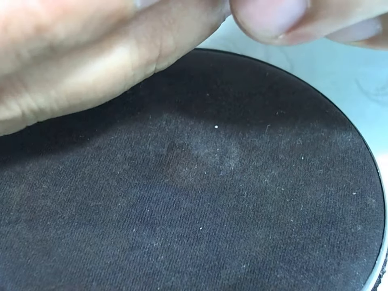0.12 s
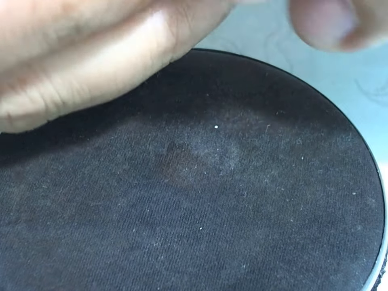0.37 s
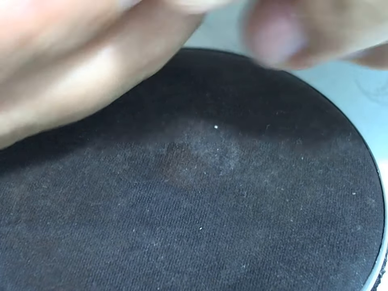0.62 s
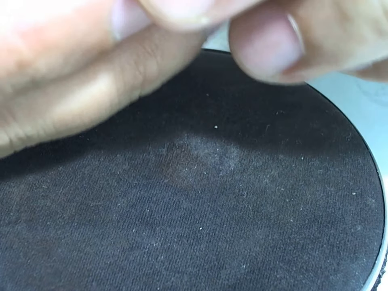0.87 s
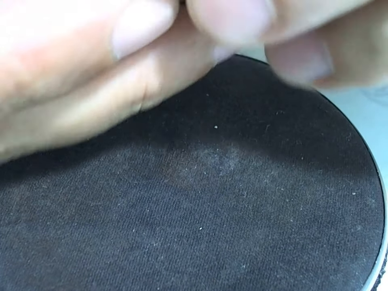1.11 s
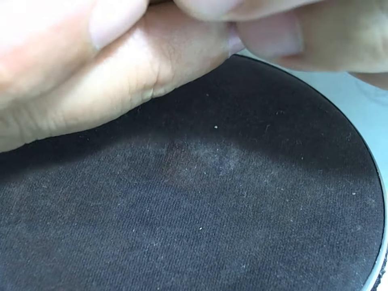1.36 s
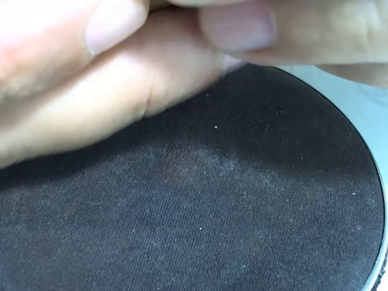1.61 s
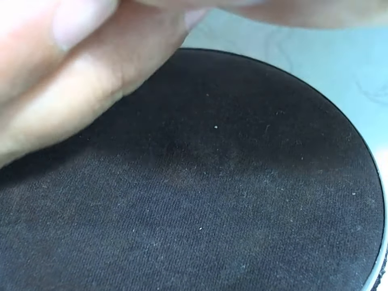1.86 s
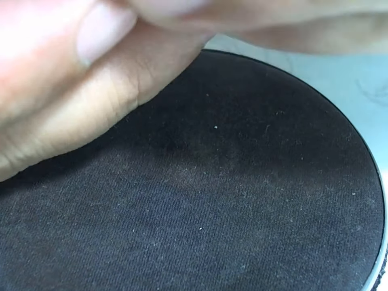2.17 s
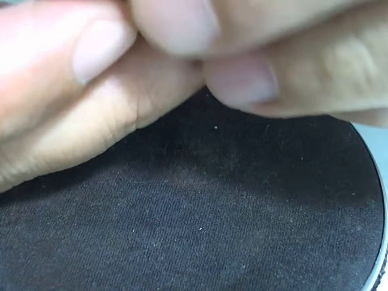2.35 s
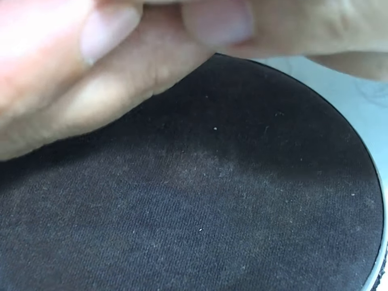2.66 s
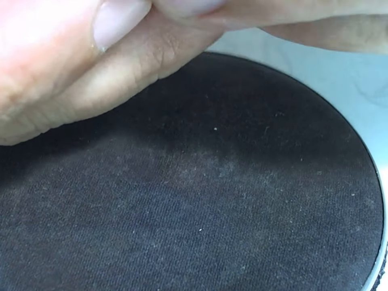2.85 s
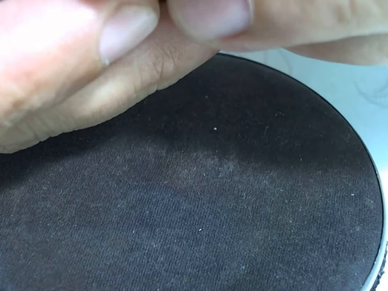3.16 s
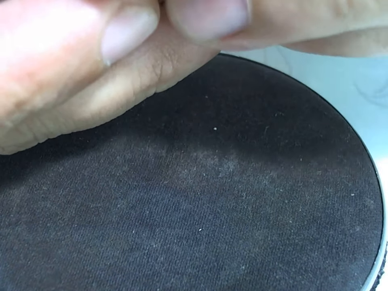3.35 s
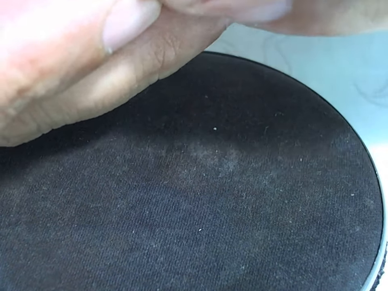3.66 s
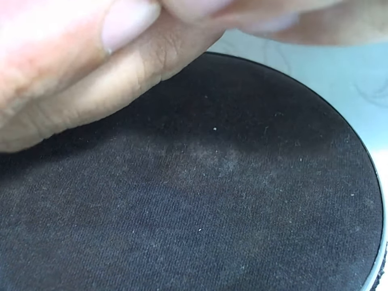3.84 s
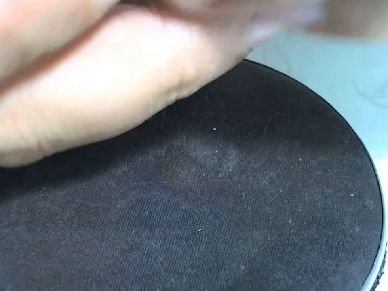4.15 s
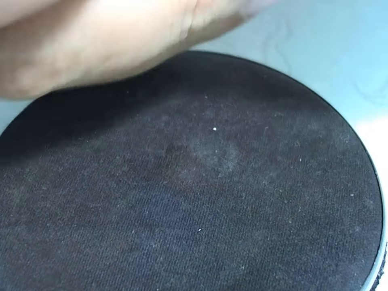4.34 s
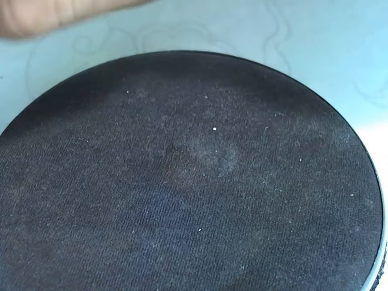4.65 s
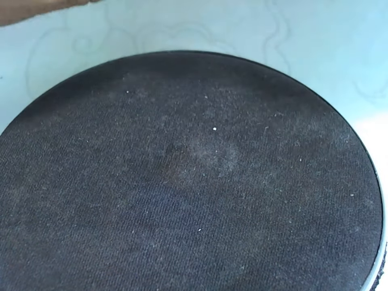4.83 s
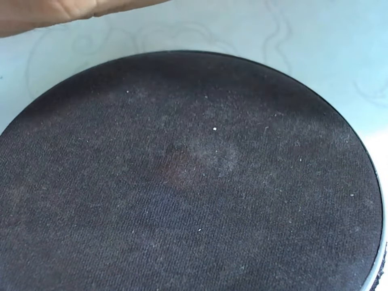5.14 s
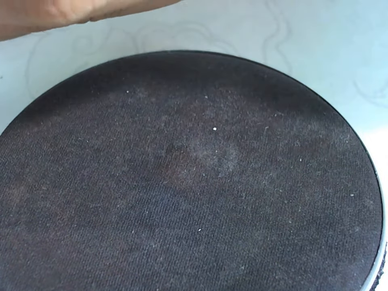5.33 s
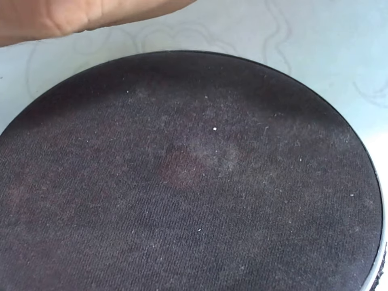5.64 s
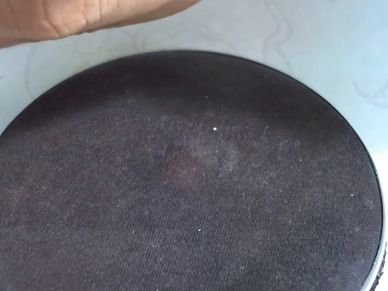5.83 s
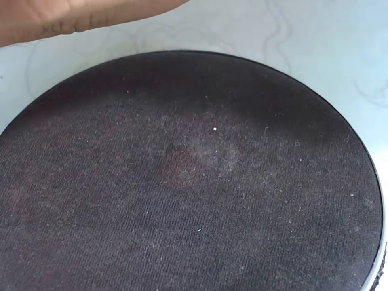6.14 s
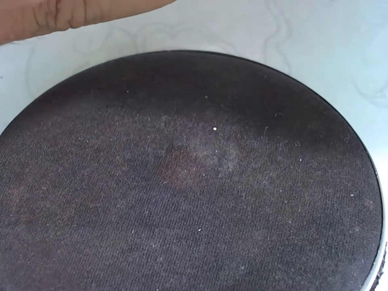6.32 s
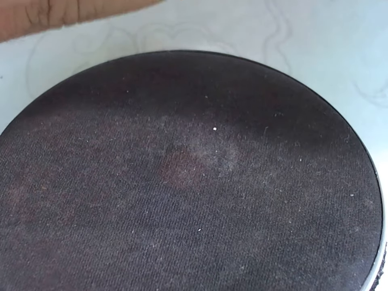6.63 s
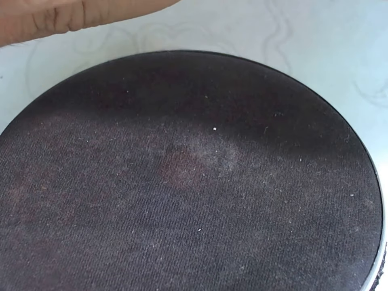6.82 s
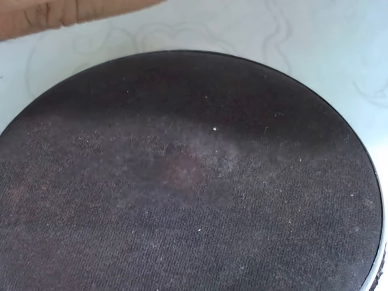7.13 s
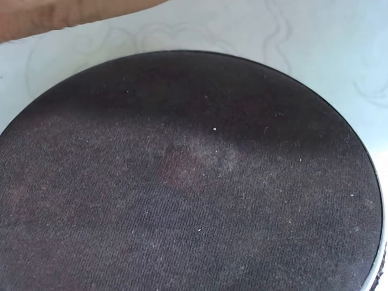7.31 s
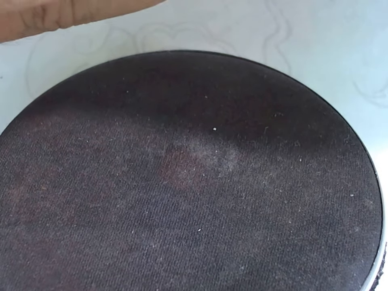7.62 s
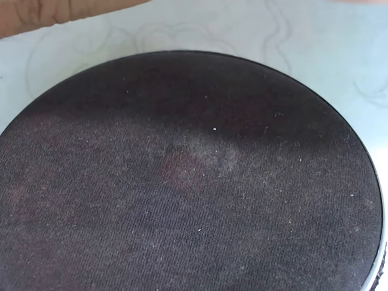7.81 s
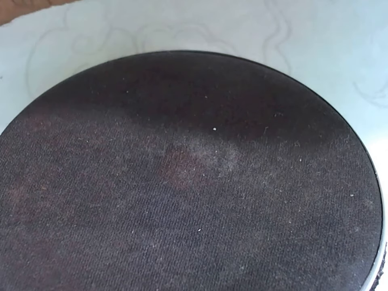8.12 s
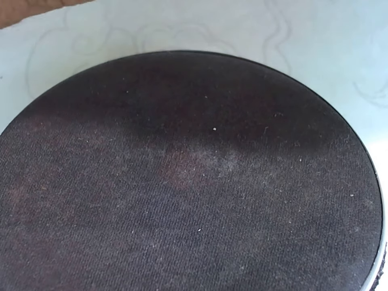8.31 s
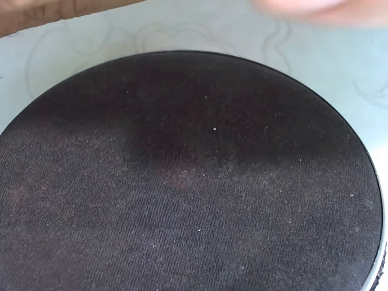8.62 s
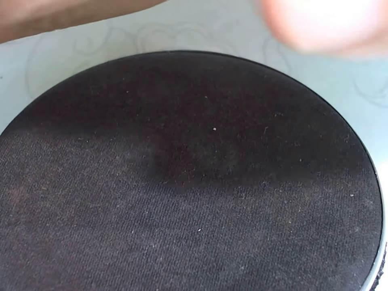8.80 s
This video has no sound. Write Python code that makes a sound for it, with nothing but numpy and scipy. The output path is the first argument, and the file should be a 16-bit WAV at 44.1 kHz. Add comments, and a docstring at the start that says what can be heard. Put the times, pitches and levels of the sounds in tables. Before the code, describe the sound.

Fingers work over a cloth-covered pad on a workbench, making irregular clusters of hollow little knocks and bright nail scratches. The hand bumps the bench softly, and nails briefly rub the cloth. The taps grow hardest past the middle, followed by a dull bump and lighter scrapes. A small microphone sits close by in a small room with a faint low hum.

```python
"""A small room, a small microphone close to fingers working over a cloth-covered bench pad.
Low hum, air, a stirring hand and a faint high tick are there from the start. Touches follow at once, each
a cluster of slips: a hollow fingertip knock, a bright nail scratch, now and then a tone ringing on.
From 1.3 s the hand bumps the bench dully; from 2.6 s nails rub the cloth and skin shuffles on the bench.
The hardest knocks come between 5 and 7 s, the heaviest bump near 8 s."""
import sys
import numpy as np
from scipy import signal
from scipy.fft import rfft, irfft
from scipy.io import wavfile
from scipy.ndimage import uniform_filter1d

SR = 44100
rng = np.random.default_rng(int(sys.argv[2]) if len(sys.argv) > 2 else 0)


def unload_wav(signal):
    """Save mono or channel-first audio to the path in sys.argv[1] as 16-bit WAV at rate SR, clipped to [-1, 1]."""
    wavfile.write(
        sys.argv[1],
        SR,
        np.round(np.clip(np.atleast_2d(signal).T, -1, 1) * 32767).astype(np.int16),
    )


N = 394694

# room hum: f/Hz, level/dB
HUM_TONES = [(203, -67), (240, -65)]
# colour of the room air: f/Hz, relative level/dB
AIR_COLOUR = [(25, -45), (55, -27), (105, -9), (290, -7.5), (420, -10), (1150, -11.5), (1450, -16.5),
              (2700, -12), (3300, -23), (4500, -16.5), (5400, -26.5), (8000, -45), (11000, -45)]
# course of the faint tick: t/s, level/dB
TICK_LEVELS = [(.45, -70), (.65, -82.5), (1.06, -61), (1.6, -72), (2.9, -78), (3.7, -60), (4.5, -88)]
# fingers touching down: t/s, knock level/dB, knock f/Hz, scratch level/dB, nominal slip spread/s
TOUCHES = [(0.074, -33, 1030, -60, 0.0075), (0.105, -31, 1100, -29, 0.0014), (0.153, -42, 910, -75, 0.0018),
           (0.241, -32.5, 910, -64, 0.0027), (0.26, -39, 920, -73, 0.0028),
           (0.284, -26.5, 990, -43, 0.0045), (.371, -23.5, 984, -39, 0.0027),
           (.378, -30, 1010, -45, 0.0017), (0.521, -42, 980, -93, 0.0039), (.785, -30, 1040, -35.5, 0.0015),
           (.927, -26, 957, -32, 0.0017), (1.015, -40.5, 970, -65, 0.0053), (1.195, -31, 780, -43, 0.00061),
           (1.201, -21.5, 966, -26, 0.0011), (1.209, -24, 1153, -28, 0.0039),
           (1.705, -46.5, 820, -42, 0.00089), (1.934, -30, 1087, -48, 0.0024),
           (1.966, -39.5, 1190, -58.5, 0.0034), (2.079, -37, 1220, -65, 0.0015),
           (2.139, -31, 775, -55, 0.0014), (2.181, -26, 1027, -52, 0.0068),
           (2.226, -31, 1150, -34, 0.00098), (2.286, -24, 1110, -32, 0.00043),
           (2.33, -26.5, 1210, -34, 0.0027), (2.584, -50, 1490, -42.5, 0.0029),
           (2.606, -46, 1180, -40.5, 0.0018), (2.706, -28.5, 1020, -35, 0.0015),
           (2.718, -38, 900, -36, .0007), (2.764, -47, 1120, -33.5, 0.00053),
           (2.772, -31, 1420, -32.5, 0.00096), (2.827, -48.5, 895, -48, 0.00096),
           (3.004, -45, 1210, -60, 0.0054), (3.291, -24.5, 1010, -33.5, 0.0016),
           (3.296, -21.5, 990, -23.5, 0.0013), (3.313, -27, 1130, -27.5, 0.00019),
           (3.461, -45.5, 1030, -67, .004), (3.504, -29.5, 1030, -83, 0.001),
           (3.798, -40, 970, -54.5, 0.0025), (3.904, -37.5, 960, -80, 0.0026),
           (4.498, -26, 1066, -37.5, 0.0026), (4.517, -27, 1280, -31, 0.0019),
           (4.533, -29.5, 1394, -32, 0.0028), (4.949, -32.5, 1006, -61, 0.0012),
           (4.978, -35.5, 1240, -65.5, 0.0034), (5.348, -19, 950, -21, 0.0024),
           (5.357, -24.5, 1240, -47, 0.0021), (5.564, -39, 920, -77, 0.0034),
           (5.613, -25, 840, -31, 0.0025), (5.794, -29.5, 1150, -46.5, .0009),
           (5.801, -34, 1290, -45, 0.00097), (5.844, -29.5, 1050, -45.5, 0.0016),
           (6.179, -19, 1017, -31, 0.0022), (6.219, -32.5, 1045, -74, 0.0012),
           (6.312, -37.5, 955, -79, 0.0011), (6.598, -25.5, 974, -64, 0.0031),
           (6.633, -28.5, 1000, -57, 0.0072), (6.644, -19.5, 1070, -38, 0.0053),
           (6.670, -25, 994, -41, 0.0008), (6.942, -25.5, 850, -28, 0.0011),
           (6.956, -25, 1020, -40, 0.0029), (6.984, -20.5, 990, -33.5, 0.00055),
           (7.001, -17.5, 1065, -29.5, 0.00094), (7.241, -39, 1190, -58.5, 0.0018),
           (7.281, -25, 1083, -52, 0.0015), (7.307, -33, 1000, -50, 0.0015),
           (7.341, -29, 910, -52.5, 0.0021), (7.368, -25, 1224, -62, 0.0043),
           (7.404, -35.5, 1110, -68, 0.0021), (7.514, -37.5, 1144, -60.5, 0.0025),
           (7.61, -29, 985, -58, 0.0057), (7.65, -34, 1200, -70, 0.0076), (7.703, -43, 1000, -73, .0037),
           (7.754, -26, 890, -50, 0.0003), (7.787, -34.5, 733, -61, 0.0032), (7.9, -31, 1000, -59, 0.0044),
           (7.934, -26.5, 1025, -53, 0.0037), (7.965, -27, 920, -60, 0.0011),
           (7.999, -36, 1100, -45, 0.0014), (8.252, -33, 970, -48.5, 0.004),
           (8.312, -32.5, 990, -44, 0.0016), (8.503, -42, 1670, -50.5, 0.0019),
           (8.555, -40, 1550, -49.5, 0.0012), (8.785, -39, 1440, -48.5, 0.0063),
           (8.823, -30.5, 1040, -39.5, 0.0013), (8.856, -37.5, 1030, -53, 0.0028)]
# hollow resonances under every knock: f/Hz, t60/s, relative level/dB
BODY_MODES = [(786, 0.025, 5.5), (997, 0.031, -6), (1040, 0.013, -25), (1306, 0.029, 7.5),
              (1740, 0.055, -12)]
# colour of the slipping nail: f/Hz, relative level/dB
NAIL_COLOUR = [(100, -52.5), (330, -21.5), (480, 5), (1300, 5.5), (1700, -0.5), (2100, -7), (2900, -0.5),
               (3800, 3), (5000, 3), (6500, -19.5), (7300, -22), (9800, -36), (10500, -44.5), (16000, -44)]
# the nail's low, middle, upper and top ring: t60/s, pitch spread/fraction
NAIL_RINGS = [(0.046, .004), (0.014, 0.0099), (0.00053, .02), (.014, .011)]
# colour of the sizzle at the nail's edge: f/Hz, relative level/dB
SIZZLE_COLOUR = [(100, -61), (6000, -11), (7200, -13), (8200, 7), (9100, -2.5), (9800, 0.5), (10200, -29.5),
                 (16000, -33)]
# the changing grip frees and retunes the rings:
# t/s, level/dB re the touch's scratch level (low, middle, upper, top ring, sizzle), middle ring f/Hz
GRIP = [(.106, -8.5, -2.5, -6.5, -19, -9.5, 4960), (.284, 1, -19, -35, -2, 2, 4450),
        (.375, -4, -6, -11, 2, -1, 4600), (.785, -30, -1.5, -28, -22, -12, 4570),
        (.927, -27, 3, -3.5, -12, 1, 4500), (1.205, -8, -6, -9, -7.5, -9.5, 4640),
        (1.705, -21, 0, -2.5, -19, -14.5, 3860), (2.226, -19, -30, -7.5, -24, -4.5, 4300),
        (2.33, -11, -2, -3.5, -24, -3.5, 4560), (2.6, -29, -2, -23, -27, -16, 4440),
        (2.712, -28, -8, -7, -25, -27, 3850), (2.77, -31, -4, 0, -20, -17, 3820),
        (3.3, -9.5, -8, -32, -21.5, -17, 3960), (4.52, -9, -0.5, -18.5, -13.5, -57, 4690),
        (5.35, -29, -13, -14.5, -16, -20, 4290), (5.613, -2.5, -4, -8, -10, -7.5, 4500),
        (5.798, -10, -18, -15, -5.5, -12, 4530), (5.845, -26, 7.5, -25, -7.5, -22, 4640),
        (6.178, -4, -1.5, -4.5, 2, -19.5, 4780), (6.65, -16, 0.5, -19.5, -3.5, -10.5, 4750),
        (6.97, -55, -8, -10, -8, -42, 4370), (7.29, -32, 2.5, -17, -2, -30, 4350),
        (7.755, -6.5, -17, -13, -1, 0, 4450), (7.97, -32, 0.5, -12, -4.5, -14, 4200),
        (8.28, -4.5, -28, -6.5, -16, -29, 5000), (8.82, -4.5, -7, -5, 1.5, -21, 4660)]
# colour of rubbed cloth: f/Hz, relative level/dB
CLOTH_COLOUR = [(100, -49.5), (250, -28.5), (520, 10), (1250, 4), (1650, 11), (2100, -1.5), (2700, -2),
                (3200, -7), (3750, -2), (4600, -6), (5900, -6), (7200, -8), (8400, -10.5), (9700, -20),
                (10200, -26), (16000, -29)]
# tones left by a clean release: t/s, f/Hz, level/dB, t60/s
PINGS = [(.288, 2630, -43, 0.051), (0.373, 2600, -62, .06), (0.926, 8330, -33.5, .21),
         (1.202, 4510, -33, 0.031), (7.0, 8420, -41, .08)]
# the side of the hand pushing on the bench: middle t/s, nominal level/dB, judder half-length/s
BUMPS = [(1.255, -47.5, .007), (1.313, -47, .007), (1.436, -44.5, .007), (1.458, -43.5, .007),
         (1.493, -41.5, .007), (1.566, -48, .01), (2.553, -46.5, .0089), (2.954, -48.5, .007),
         (3.023, -43.5, .01), (3.107, -47, .011), (3.178, -47, .007), (3.393, -48, .007),
         (3.444, -41.5, 0.026), (3.553, -42, 0.015), (3.656, -43.5, .008), (3.984, -47, .0073),
         (5.186, -42, .008), (6.384, -44.5, 0.024), (6.434, -47.5, 0.0061), (7.234, -45, 0.0063),
         (8.071, -35, 0.042), (8.695, -47, .0076), (8.86, -45, .0073)]
# longer drags over the cloth: middle t/s, length/s, cloth, rasp and hiss level/dB, hiss f/Hz
RUBS = [(2.597, 0.1, -41, -59, -59, 9400), (2.722, 0.062, -35, -51, -60, 7900),
        (2.796, 0.089, -42, -52, -63, 8000), (4.537, .13, -39, -46.5, -66, 8100),
        (5.611, 0.05, -34, -44.5, -49.5, 8440), (5.856, .17, -51.5, -55, -63, 8600),
        (6.179, 0.054, -29.5, -42, -45, 8000), (6.648, .055, -47, -45, -44, 8700),
        (6.99, 0.032, -36.5, -33.5, -34, 8300), (7.343, 0.14, -53, -63, -63, 8500),
        (7.612, 0.067, -63, -50, -62.5, 8700), (7.656, 0.11, -62, -62, -62, 9050),
        (7.962, .26, -57.5, -62, -70, 8400), (8.248, 0.084, -47.5, -64, -56, 8800),
        (8.491, 0.11, -51, -57.5, -57, 8670), (8.557, 0.077, -44.5, -62, -60.5, 8800),
        (8.784, 0.073, -44.5, -58, -51, 9000), (8.821, .059, -33, -54, -41.5, 8600)]
# skin dragging on the bench: middle t/s, length/s, level/dB before the fades, f/Hz
SHUFFLES = [(2.618, 0.045, -46.5, 543), (2.653, .05, -47, 840), (2.723, 0.049, -36.5, 527),
            (4.516, .04, -43.5, 555), (5.352, 0.0162, -37, 558), (5.604, 0.03, -39.5, 410),
            (7.798, 0.079, -42.5, 610), (7.813, 0.066, -39.5, 278), (7.85, 0.032, -40.5, 314)]

SIZE, LEAD = 4096, 1024  # samples in one short sound, and samples ahead of its moment of contact
LOW_RING_HZ, TOP_RING_HZ, UPPER_TO_MIDDLE_RATIO = 2628, 8355, 1.21
SETTLE_CHANCE, SETTLE_S, SETTLE_DB, SETTLE_SPREAD_S = 0.51, .022, -20.5, 0.0027


def undb(db):
    return 10 ** (np.asarray(db) / 20)


def unit(x):
    """Scale to an energy of one."""
    return x / np.sqrt(np.sum(x ** 2) + 1e-18)


def level(x, db, seconds):
    """Scale so that the energy, spread over this time, has the given rms level."""
    return unit(x) * undb(db) * np.sqrt(seconds * SR)


def add(out, x, s):
    """Mix x into out from time s."""
    i = int(round(s * SR))
    a, b = max(i, 0), min(i + len(x), N)
    out[a:b] += x[a - i:b - i]


def through(x, response):
    return signal.fftconvolve(x, response)[:len(x)]


def colour(points):
    """Causal impulse response of a spectrum given as f/Hz, level/dB."""
    hz, db = np.transpose(points)
    f = np.maximum(np.fft.rfftfreq(SIZE, 1 / SR), 1)
    gain = undb(np.interp(np.log(f), np.log(hz), db))
    cepstrum = irfft(np.log(gain))
    cepstrum[1:SIZE // 2] *= 2  # fold to minimum phase
    cepstrum[SIZE // 2 + 1:] = 0
    return unit(irfft(np.exp(rfft(cepstrum))))


def ring(modes, vary_db=0, detune=0):
    """Impulse response of damped modes; the place of contact shifts their shares and pitches."""
    t, out = np.arange(SIZE) / SR, 0
    for (hz, t60, db), (share, shift) in zip(modes, rng.standard_normal((len(modes), 2))):
        swing = np.sin(2 * np.pi * hz * (1 + detune * shift) * t) * np.exp(-np.log(1000) * t / t60)
        out = out + undb(db + vary_db * share) * unit(swing)
    return unit(out)


def resonate(x, hz, q):
    """A resonance applied twice, for steep skirts."""
    b, a = signal.iirpeak(hz, q, fs=SR)
    return signal.lfilter(b, a, signal.lfilter(b, a, x))


def walk(rate_hz):
    """Smooth random drift with a spread of one."""
    hold = int(SR / rate_hz)
    steps = np.repeat(rng.standard_normal(N // hold + 1), hold)
    drift = uniform_filter1d(steps, hold)[:N]
    return drift / drift.std()


def grit(size, scatter_db):
    """Fibres catch and let go: dense clicks of very uneven size."""
    clicks = rng.standard_normal(size) * undb(scatter_db * np.minimum(rng.exponential(size=size), 5))
    return clicks / clicks.std()


def slips(width_s, creep_s, creep_db, scatter_db, rise=0.69, fall=1.02, build=0.93):
    """A burst of grit that starts abruptly and dies away, with a fainter creep before and after it."""
    t = (np.arange(SIZE) - LEAD) / SR
    since_peak = t + (fall - rise) * width_s
    burst_shape = np.exp(-.5 * (since_peak / (width_s * np.where(since_peak < 0, rise, fall))) ** 2)
    creep_shape = np.exp(-np.abs(t) / (creep_s * np.where(t < 0, build, 1)))
    burst = unit(grit(SIZE, scatter_db) * burst_shape)
    creep = unit(grit(SIZE, scatter_db) * creep_shape)
    return burst + undb(creep_db) * creep


def room_tone(waver=0.65, air_db=-58.5, drift_db=-1.2):
    """The room behind the hands: a wavering low hum in smooth air."""
    t, hum = np.arange(N) / SR, 0
    for hz, db in HUM_TONES:
        amplitude = undb(db) * np.sqrt(2) * (1 + waver * walk(14))
        hum = hum + amplitude * np.sin(2 * np.pi * hz * t + waver * walk(15))
    air = through(rng.standard_normal(N), colour(AIR_COLOUR))
    return hum + air * undb(air_db + drift_db * walk(5.4))


def resting_hand(hz=232, q=1.5, db=-67.5, uneven_db=5):
    """Small shifts of the resting hand keep stirring the bench's low resonance."""
    push = rng.standard_normal(N) * undb(uneven_db * np.minimum(walk(22), 2))
    return level(resonate(push, hz, q), db, N / SR)


def ticking(hz=9500, q=22, period_s=.2, uneven_db=3):
    """A tiny high rasp repeats five times a second, far down in the room tone."""
    out = np.zeros(N)
    for s in np.arange(.058, N / SR, period_s):
        rasp = resonate(slips(width_s=0.011, creep_s=.008, creep_db=-7.5, scatter_db=2), hz, q)
        db = np.interp(s, *np.transpose(TICK_LEVELS)) + uneven_db * rng.standard_normal()
        add(out, level(rasp, db, .02), s - LEAD / SR)
    return out


def knock(hz, spread_s, softness, hard_q=2.86, soft_q=4.0, body_db=-6, early_s=0.001538):
    """The fingertip passes slips near its pitch, the softer the rounder; they ring the hollow body."""
    force = slips(1.69 * spread_s, creep_s=0.0092, creep_db=-10, scatter_db=1.5, build=.5)
    push = resonate(np.roll(force, -int(early_s * SR)), hz, hard_q + softness * (soft_q - hard_q))
    push = signal.sosfilt(signal.butter(4, [420, 1580], "band", fs=SR, output="sos"), push)
    body = through(push, ring(BODY_MODES, vary_db=-6.5, detune=0.018))
    return unit(push) + undb(body_db) * unit(body)


def nail_ring(force, hz, t60, detune, treble_cut_hz=8860):
    """The slips set one thin ring going, filtered round its pitch, with the highest treble cut off."""
    rung = resonate(through(force, ring([(hz, t60, 0)], detune=detune)), hz, q=4.7)
    return signal.sosfilt(signal.butter(8, treble_cut_hz, fs=SR, output="sos"), rung)


def hollow(x, delay_s=.0011, echo=0.93, vary=.25):
    """The gap between finger and pad, a different width each time, echoes the slips and hollows them."""
    lag = int(SR * delay_s * np.exp(vary * rng.standard_normal()))
    return x + echo * np.roll(x, lag)


def grip_at(s):
    """The grip at time s: levels of the four rings and the sizzle, then the middle ring's pitch."""
    times, *columns = np.transpose(GRIP)
    return [np.interp(s, times, column) for column in columns]


def touch(tip_db, hz, nail_db, spread_s, grip, nail, edge, soft_db=-43, slide_s=0.0013, dry_db=-3):
    """One touch heard close: knock and dry scratch, with rings and sizzle weighted by the grip."""
    # a light nail slides instead of snapping, so its slips spread out
    softness = 1 / (1 + undb(2 * (nail_db - soft_db)))
    force = slips(1.64 * spread_s + softness * slide_s, creep_s=0.0092, creep_db=-7.5, scatter_db=3.5)
    *grip_db, middle_hz = grip
    pitches = [LOW_RING_HZ, middle_hz, UPPER_TO_MIDDLE_RATIO * middle_hz, TOP_RING_HZ]
    rings = [nail_ring(force, pitch, *mode) for pitch, mode in zip(pitches, NAIL_RINGS)]
    sizzle = through(hollow(force), edge)
    tip = knock(hz, spread_s, softness)
    scratch = through(hollow(force), nail)
    parts = [(tip, tip_db), (scratch, nail_db + dry_db)]
    parts += [(part, nail_db + db) for part, db in zip(rings + [sizzle], grip_db)]
    return sum(level(part, db, .01) for part, db in parts)


def touches():
    """Fingers touch down by the microphone, and often settle with a lighter pat of the soft tip."""
    out, nail, edge = np.zeros(N), colour(NAIL_COLOUR), colour(SIZZLE_COLOUR)
    settling = rng.random((len(TOUCHES), 2))
    for (s, tip_db, hz, nail_db, spread_s), (chance, delay) in zip(TOUCHES, settling):
        start = s - LEAD / SR
        add(out, touch(tip_db, hz, nail_db, spread_s, grip_at(s), nail, edge), start)
        pat = level(knock(hz, SETTLE_SPREAD_S, softness=1), tip_db + SETTLE_DB, .01)
        if chance < SETTLE_CHANCE:
            add(out, pat, start + SETTLE_S * (.5 + delay))
    return out


def stroke(s, length, catch):
    """Grit that swells and fades round time s, stronger wherever the nail catches."""
    size = int(length * SR)
    caught = catch.take(int((s - length / 2) * SR) + np.arange(size), mode="clip")
    return np.pad(grit(size, scatter_db=3.5) * np.hanning(size) * caught, (0, LEAD))


def nail_drags(catch, length_s=0.052, lag_s=0.0037, relative_db=-11):
    """The nail drags briefly on the cloth round each touch, below the level of its scratch."""
    out, cloth = np.zeros(N), colour(CLOTH_COLOUR)
    for s, _, _, nail_db, _ in TOUCHES:
        drag = through(hollow(stroke(s, length_s, catch)), cloth)
        drag = level(drag, nail_db + relative_db, length_s * 3 / 8)  # 3/8: mean square of the swell
        add(out, drag, s + lag_s - length_s / 2)
    return out


def pings(onset_s=.001):
    """A clean release leaves one thin tone ringing on."""
    out, t = np.zeros(N), np.arange(SR // 4) / SR
    for s, hz, db, t60 in PINGS:
        envelope = np.exp(-np.log(1000) * t / t60) * (1 - np.exp(-t / onset_s))
        add(out, level(np.sin(2 * np.pi * hz * t) * envelope, db, .01), s)
    return out


def bumps(bench_hz=232.8, swell_s=0.0045, fade_s=0.0093, judder_s=.027, gain_db=0.5, pitch_spread=0.05):
    """A soft push swells the bench's low resonance; a long one judders as the skin keeps catching."""
    out, t = np.zeros(N), (np.arange(SIZE) - SIZE // 2) / SR
    envelope = np.sqrt(2) * np.exp(-.5 * (t / np.where(t < 0, swell_s, fade_s)) ** 2)
    for s, db, half_s in BUMPS:
        for lag in judder_s * np.arange(-3, 4):
            push = undb(db + gain_db) * np.exp(-.5 * (lag / half_s) ** 2)
            hz = bench_hz * (1 + pitch_spread * rng.standard_normal())
            swing = np.sin(2 * np.pi * (hz * t + rng.random()))
            add(out, push * envelope * swing, s + lag - SIZE / 2 / SR)
    return out


def rubs(catches):
    """A nail drawn over the weave catches unevenly: broad cloth noise, a rasp and a high hiss."""
    out, cloth = np.zeros(N), colour(CLOTH_COLOUR)
    for s, length, cloth_db, rasp_db, hiss_db, hiss_hz in RUBS:
        rasp_hz = grip_at(s)[-1]
        weave, rasp, hiss = (stroke(s, length, catch) for catch in catches)
        parts = [(through(hollow(weave), cloth), cloth_db),
                 (resonate(hollow(rasp), rasp_hz, q=4), rasp_db),
                 (resonate(hollow(hiss), hiss_hz, q=10), hiss_db)]
        rub = sum(level(part, db, length * 3 / 8) for part, db in parts)
        add(out, rub, s - length / 2)
    return out


def shuffles(q=2.1):
    """Skin drags on the bench with a low rough rumble."""
    out = np.zeros(N)
    for s, length, db, hz in SHUFFLES:
        size = int(length * SR)
        drag = level(resonate(grit(size, scatter_db=1.0), hz, q), db, length)
        add(out, drag * np.hanning(size), s - length / 2)
    return out


def room(x, t60_s=0.15, tail_db=-14, onset_s=0.002):
    """Nearby surfaces answer with a short dense tail, well under the direct sound at this distance."""
    t = np.arange(SR // 4) / SR
    tail = rng.standard_normal(len(t)) * undb(-60 * t / t60_s) * (1 - np.exp(-(t / onset_s) ** 2))
    return x + undb(tail_db) * through(x, unit(tail))


def scene(catch_db=5.5, catch_rate_hz=150):
    """What reaches the microphone at the bench, in mono: fingers with their room tail, the rest dry."""
    taps = touches()
    catches = [undb(catch_db * walk(catch_rate_hz)) for _ in range(3)]  # cloth, rasp, hiss
    fingers = taps + rubs(catches) + nail_drags(catches[0]) + shuffles()
    return (room(fingers) + pings() + bumps() + resting_hand() + ticking() + room_tone())[None]


def record(dry, low_cut_hz=75, top_hz=15900):
    """A small microphone with little bass; the recorder cuts the top."""
    thin = signal.sosfilt(signal.butter(2, low_cut_hz, "high", fs=SR, output="sos"), dry)
    return signal.sosfilt(signal.ellip(8, .2, 70, top_hz, fs=SR, output="sos"), thin)


dry = scene()
out = record(dry)
unload_wav(out)
```